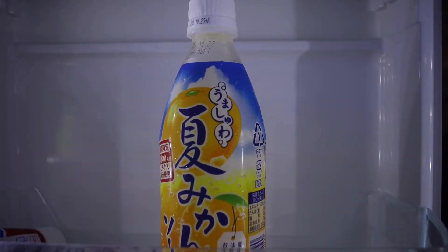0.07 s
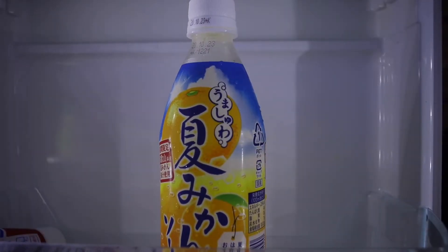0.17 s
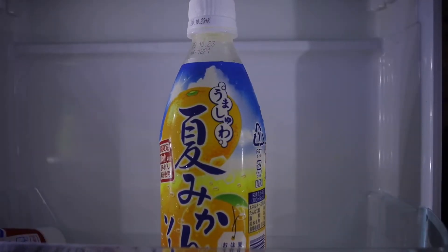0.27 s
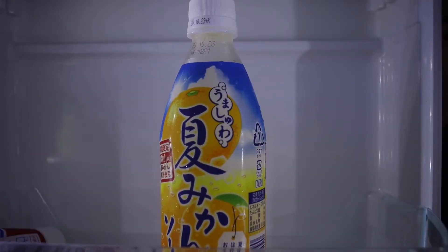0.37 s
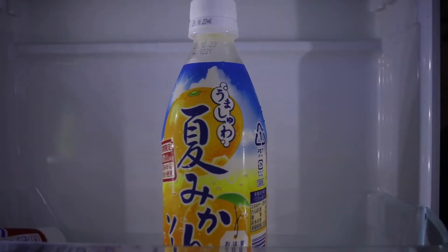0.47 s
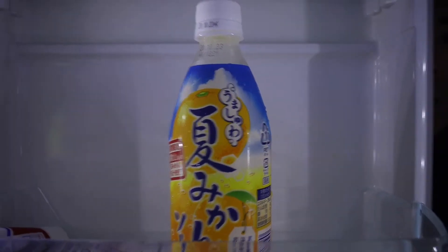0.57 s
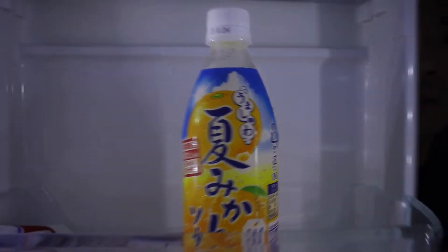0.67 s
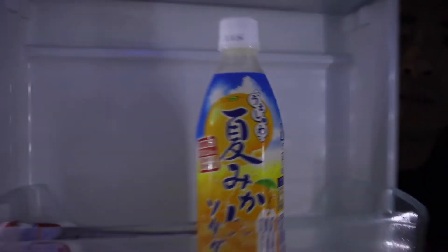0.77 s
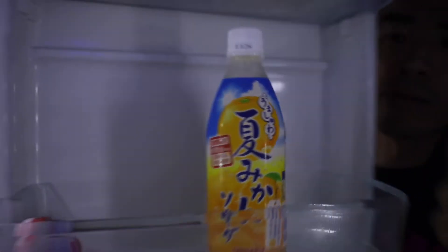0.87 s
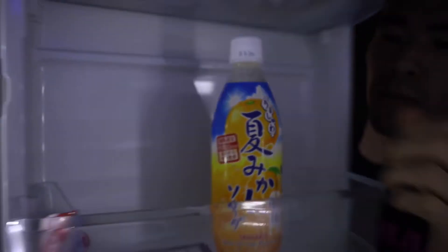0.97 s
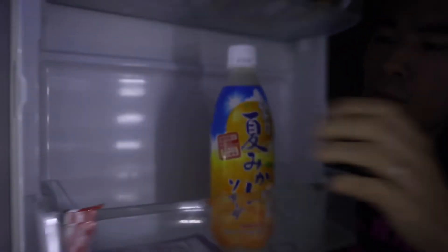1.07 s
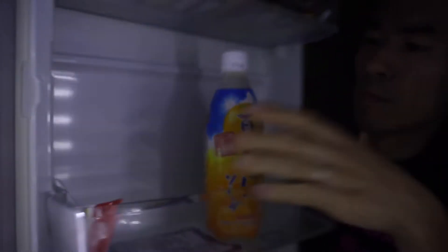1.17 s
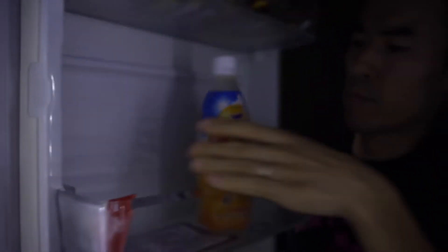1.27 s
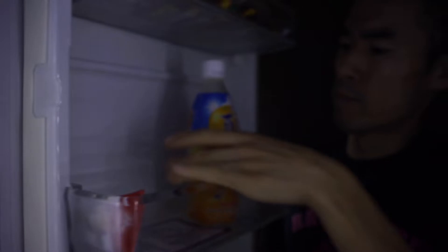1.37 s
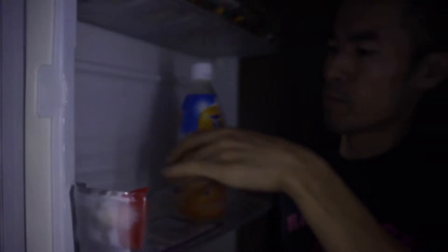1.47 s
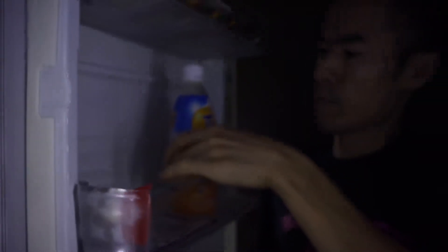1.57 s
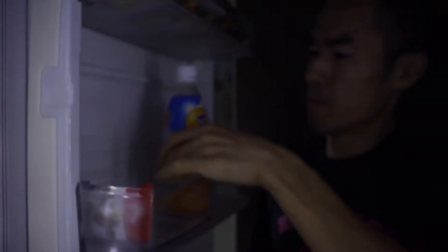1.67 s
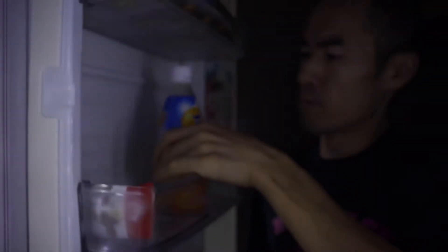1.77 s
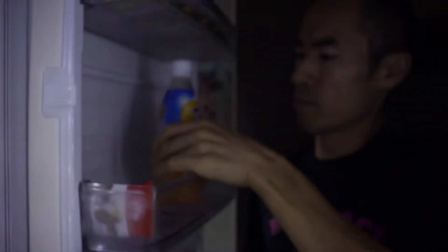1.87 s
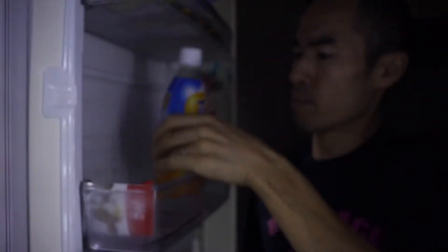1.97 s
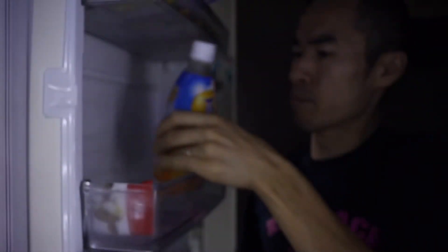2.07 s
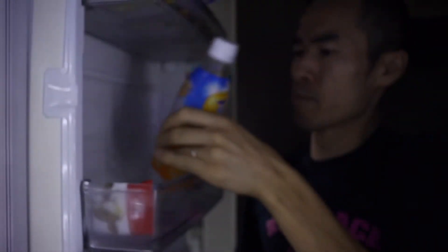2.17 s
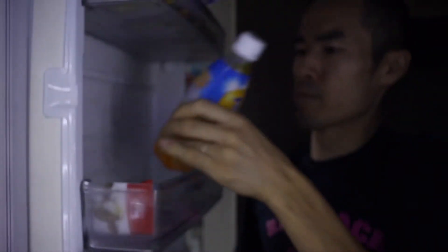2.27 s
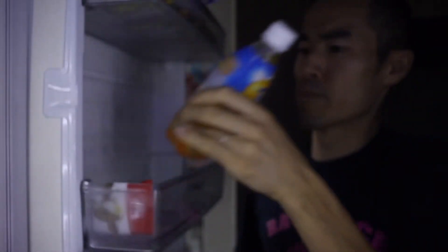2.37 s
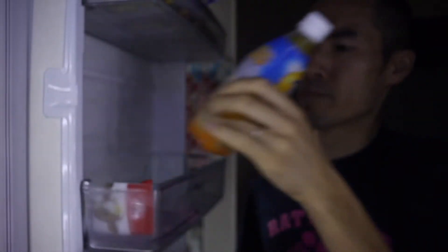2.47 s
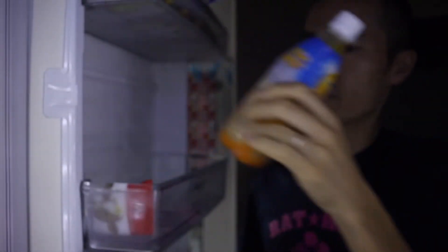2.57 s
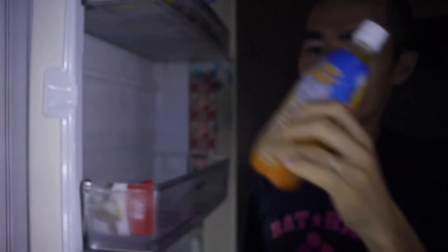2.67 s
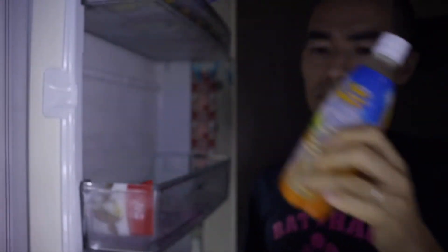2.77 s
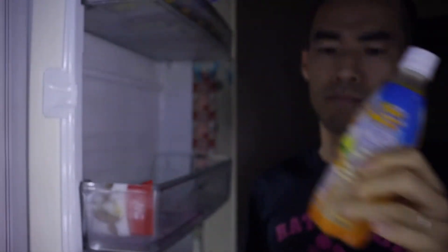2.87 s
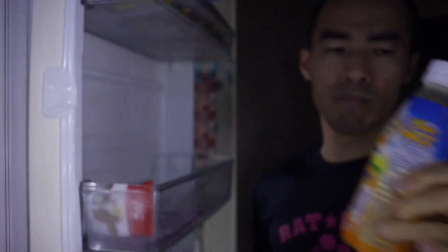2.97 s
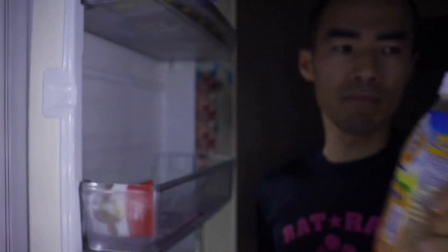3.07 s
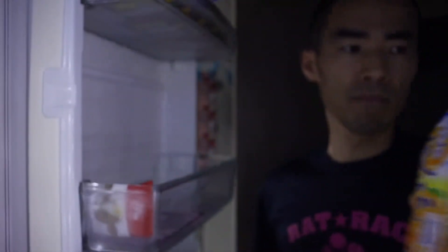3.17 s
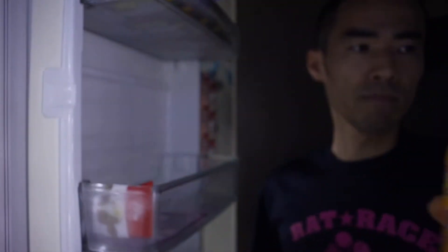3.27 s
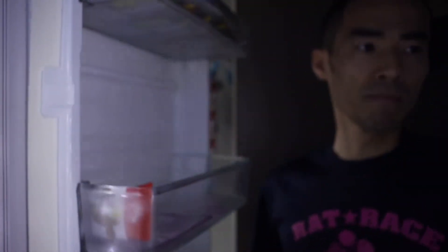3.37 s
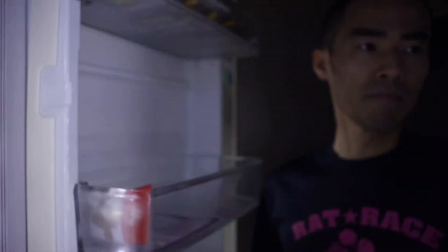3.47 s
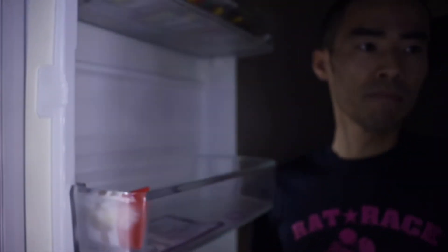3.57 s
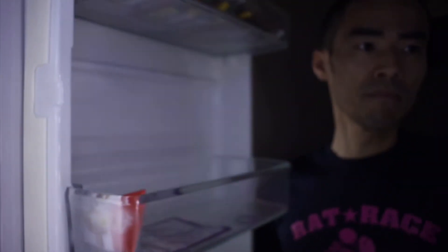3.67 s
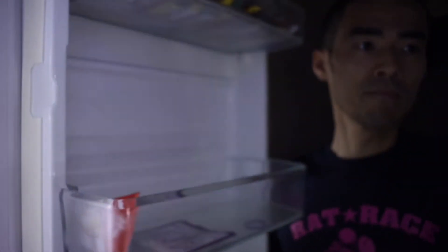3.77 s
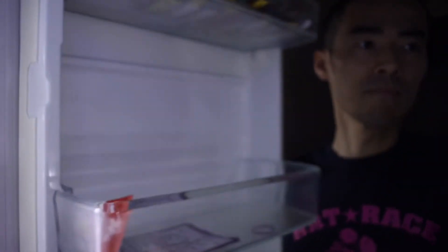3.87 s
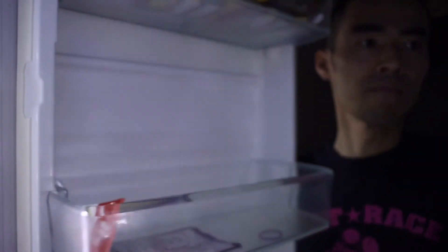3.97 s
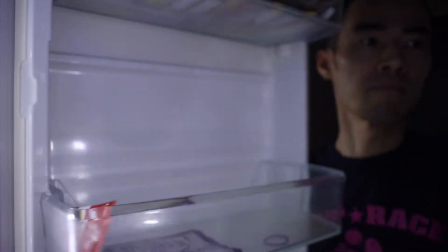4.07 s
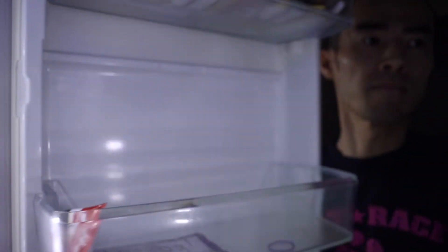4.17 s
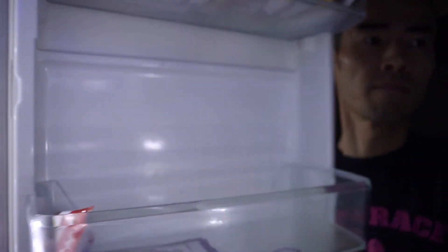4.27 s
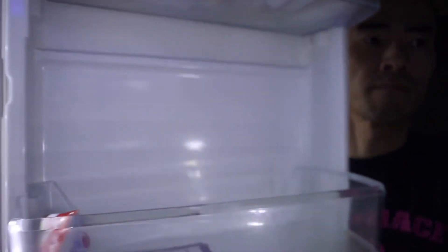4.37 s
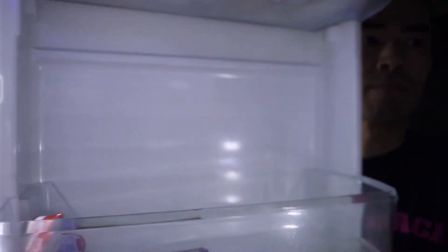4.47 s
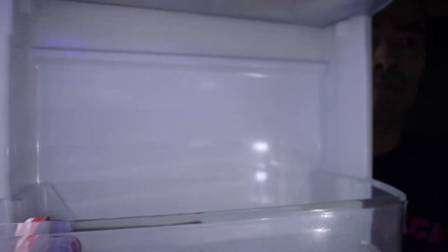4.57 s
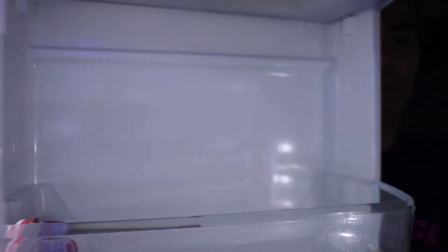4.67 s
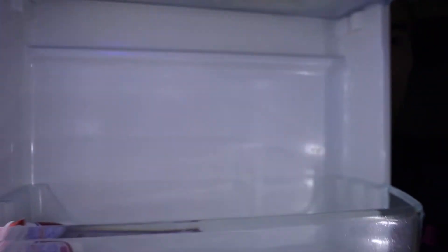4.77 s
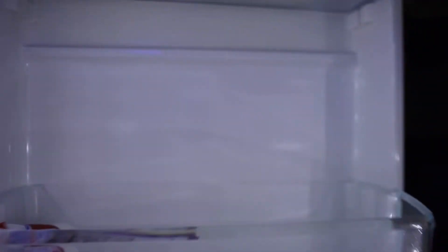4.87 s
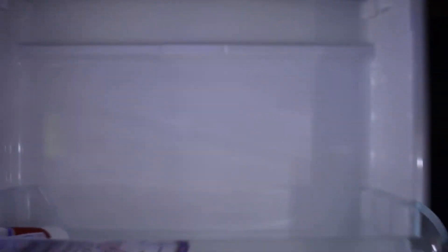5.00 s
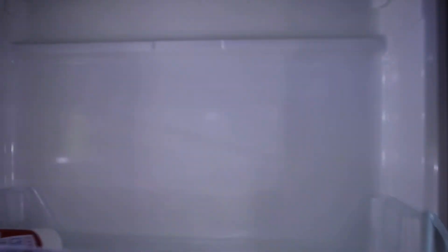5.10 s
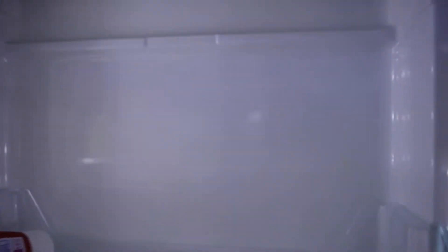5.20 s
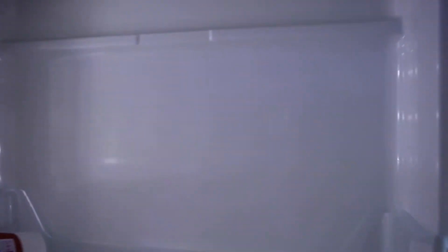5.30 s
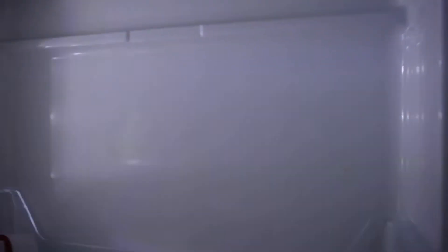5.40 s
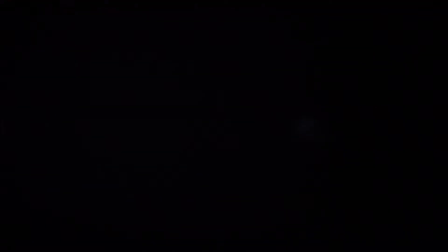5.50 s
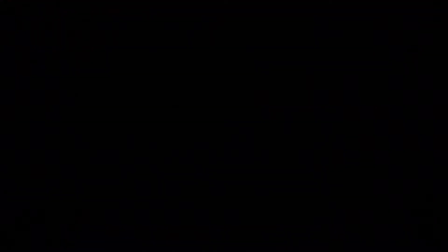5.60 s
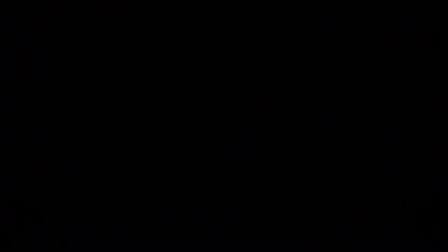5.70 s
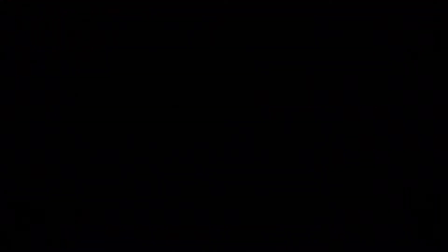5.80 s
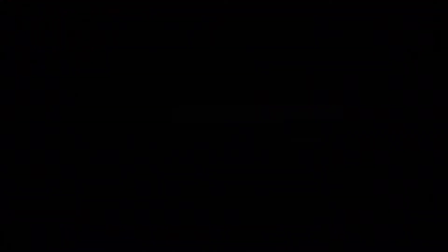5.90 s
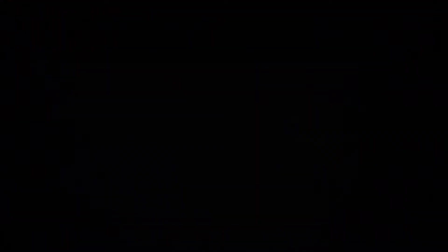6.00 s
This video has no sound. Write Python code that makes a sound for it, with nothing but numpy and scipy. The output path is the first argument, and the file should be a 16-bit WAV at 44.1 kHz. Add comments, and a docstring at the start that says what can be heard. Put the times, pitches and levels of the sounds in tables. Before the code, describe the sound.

A fridge door's seal peels open with sharp snaps, a full plastic bottle clacks in its rack, then the door slams with a boom.

```python
"""A refrigerator heard from inside its door, over low hum, rumble and soft hiss. The magnetic seal peels open with
sharp snaps, the door swings with dull knocks, a sleeve rustles and a full plastic bottle clacks and rocks in its rack.
The machine runs down and the bottle is lifted out. The door swings back, its hinge clicks, the seal is squeezed, the
catch snaps over and a heavy thump booms in the cabinet and leaves the shelves shuddering.
Blows ring decaying modes and dense noise clatter; rubs are uneven coloured noise; booms are swelling low sines."""
import sys
import numpy as np
from scipy import signal
from scipy.fft import rfft, irfft, next_fast_len
from scipy.io import wavfile
from scipy.ndimage import uniform_filter1d

SR = 44100
rng = np.random.default_rng(int(sys.argv[2]) if len(sys.argv) > 2 else 0)


def pcm_store(signal):
    """Save signal as 16-bit PCM."""
    levels = np.round(np.clip(np.atleast_2d(signal), -1, 1) * 32767)
    wavfile.write(sys.argv[1], SR, levels.astype(np.int16).T)


N = 266408
TIME = np.arange(N) / SR
RING = TIME[:SR]  # one second, the life of a blow

# The background's rumble and hiss. Each row: frequency in Hz, relative density in dB per Hz.
RUMBLE_COLOUR = [(15, -30), (28, -12), (43, 3), (64, -5), (88, 1), (115, 1), (150, -6), (188, 0),
                 (230, -10), (400, -22), (900, -60)]
HISS_COLOUR = [(120, -20), (260, -2), (520, -4), (1000, -10), (1700, -11), (2600, -15), (4600, -15),
               (8000, -21), (16000, -25)]
# The compressor's hum. Each row: frequency in Hz, level in dB before the on and off gains.
HUM_LINES = [(59.2, -49.5), (118.4, -57), (544, -68.5), (1370, -67)]
# Air moved by the door. Each row: peak in seconds, level in dB, attack and release in seconds per 60 dB.
DRAUGHTS = [(.1, -49.5, 1.5, 5.9), (4.2, -51, 2.7, 5.8), (5.35, -50, 1.7, 6)]
RUMBLE_DB, HISS_DB, SHUT_HISS_DB = -59, -58.5, -9.5  # the last is the change as the door shuts
MACHINE_OFF_S, RUN_DOWN_S = 1.63, 0.41
HUM_ON_DB, HUM_OFF_DB, RUSH_DB = -1, -16.5, -54.5  # a trace of hum stays
SEALING_S = 0.6  # time for the seal to close the last gap

# Rubs, in order: seal peeling in two pulls, sleeve reaching in, hand and load scuffing the rack,
# seal squeezed, catch sliding over its ramp, shelves shuddering.
# Each row: peak in seconds, nominal level in dB, attack and release in seconds per 60 dB.
PEEL_STROKES = [(.155, -32.5, 0.092, 0.24), (.22, -30.5, 0.34, 0.13)]
SLEEVE_STROKES = [(1.11, -47.5, 1, 0.94), (1.31, -48, .4, 1.6), (1.75, -56.5, .9, 2)]
SCUFF_STROKES = [(1.25, -27, 0.076, 1), (2.04, -56.5, 0.53, 0.65), (2.53, -57, .15, 0.57),
                 (3.125, -44.5, 0.056, 1), (4.06, -39, 0.41, 0.55)]
SEAL_STROKES = [(5.14, -29, 0.079, 0.6), (5.355, -21.5, 0.43, 0.37)]
SLIDE_STROKES = [(5.365, -34, 0.55, 0.054)]
SHUDDER_STROKES = [(5.5, -28.5, 0.55, 1.5), (6.0, -38, 1.6, 1.4)]
# Their colours; shelves share the seal's. Each row: frequency in Hz, relative density in dB per Hz.
PEEL_COLOUR = [(60, -10), (120, -8), (330, -3.5), (550, -11), (900, -18.5), (1900, -23.5), (3800, -20),
               (7000, -34.5), (16000, -41)]
SLEEVE_COLOUR = [(300, -16), (600, -6), (1350, -3), (2500, -9), (6000, -9), (11000, -14), (16000, -20)]
SCUFF_COLOUR = [(70, -15.5), (130, -6.5), (260, -2.5), (480, -11.5), (780, -18), (1050, -25.5), (1550, -19),
                (2600, -31), (6000, -40.5), (15000, -45.5)]
SEAL_COLOUR = [(50, -10), (90, 4.5), (200, -11.5), (400, -18), (900, -32.5), (1700, -32), (3000, -42),
               (7000, -44), (16000, -50)]
SLIDE_COLOUR = [(300, -27), (900, -3), (1500, -3), (2200, -6), (3000, -15), (7000, -25), (16000, -32)]
# Lined-door resonances in the clatter and most rubs. Each row: centre in Hz, width in Hz, lift in dB.
CAVITY = [(175.7, 44.7, 6), (259.5, 13, 9.5), (310.3, 40, 2.5), (531.6, 17.2, 7.5), (693, 50, 7.5),
          (895, 72, 12), (1239, 36, 3.5), (1352, 31, 10), (1730, 32, 3), (1874, 38, 8), (2120, 57, 4),
          (2740, 79, 5), (3180, 130, 5), (3886, 140, 3), (4760, 53, 4.5), (6190, 100, 5)]

# Low notes of the flexing door panel. Each row: start in seconds, frequency in Hz, level in dB.
THUDS = [(.147, 117, -21), (.223, 117.2, -17), (2.009, 184, -38.5), (3.892, 123, -39), (3.951, 122, -25.5),
         (4.049, 125.5, -25), (4.439, 176, -30.5), (5.047, 139, -24)]
# The landing door and the shut cabinet ringing on. Each row: frequency in Hz, level in dB, t60 in seconds.
BOOM_MODES = [(70.4, 9.5, 0.086), (74.5, -10, 0.73), (158.5, -14.5, 0.18), (209.6, -26.5, 1)]
THUD_RISE_S, THUD_T60_S = 0.007, 0.17
BOOM_S, BOOM_RISE_S = 5.3755, 0.026
# The catch jolts the panel after a short lag: Hz, dB, t60 in seconds.
JOLT_LAG_S, JOLT_MODE = 0.0088, (200, -4, 0.027)

# Sharp snaps of seal, hinge and shelves, then dull knocks of the swinging door and its load.
# Each row: start in seconds, relative level in dB, bass in dB, hardness in dB per octave.
SNAPS = [(.011, -34.5, -14, -3), (.042, -32.5, -5.5, 0.5), (.089, -27, 1.5, 1.4), (.124, -26, 0, 2.5),
         (.141, -22, -1, -1.5), (.204, -21, -5, 2.5), (.217, -11, -8, -1), (.756, -33, -9.5, -1.5),
         (4.033, -34, 0, 1), (4.049, -31, 1.5, -.5), (4.102, -41, -11, 2.5), (5.091, -23, -3, -2),
         (5.106, -31, -3, 2.5), (5.134, -22, 1, 0), (5.163, -17.5, -10, -1), (5.544, -32.5, 5, 0),
         (5.609, -35, 3, 0.5), (5.973, -25.5, -18, -3.5)]
KNOCKS = [(.535, -18, -6, -3.5), (.570, -23.5, -2, 2.5), (.665, -21.5, -0.5, -3.5), (.82, -38.5, -1.5, -4),
          (.901, -41.5, 9, -3), (.965, -28.5, 3.5, 1), (1.249, -18.5, -15, -2), (1.343, -19.5, -19, 4.5),
          (1.709, -31, 7, 1.5), (3.097, -39.5, 11.5, 3.5), (3.119, -36, 3, 5.5), (3.147, -46, 8.5, 6.5),
          (3.389, -33, -0.5, -0.5), (3.435, -40, 4.5, 0.5), (3.514, -26.5, -0.5, -0.5),
          (3.581, -31, 8, 1.5), (4.161, -29.5, -1, -3.5), (4.285, -34, -4, -5)]
# Bottle against rack, its base on the way out, hinge over its detent, catch over, door landing.
# Each row: start in seconds, relative level in dB.
CLACK = [(1.3108, -12.5)]
BUMP = [(1.892, -31.5)]
DETENT = [(3.884, -23.5)]
CATCH = [(5.239, -10)]
SLAM = [(5.3662, -14.5)]
# Ringing parts. Each row: nominal frequency in Hz, relative level in dB, t60 in seconds.
LINER_MODES = [(113.3, 1.5, 0.28), (185, -3.5, 0.21), (362, -0.5, 0.056), (537.4, -2.5, 0.16),
               (833, 6, 0.059), (1126, -2.5, 0.08), (1340, -20, 0.15), (1962, 2, 0.051), (2670, -16, 0.058),
               (3050, -4.5, 0.051), (3320, -23, 0.13), (3980, -8.5, 0.064), (4500, -12, 0.085),
               (5630, -16, 0.085)]
DOOR_MODES = [(96.2, -2.5, 0.17), (131, -11, .13), (181.1, -2.5, 0.18), (239, 0.5, 0.086), (302.7, 1, 0.1),
              (550, -14, 0.053), (751, 4, 0.049), (890, 2, 0.076), (1076, -42, 0.017), (1364, -11, 0.19),
              (1540, -3, 0.053), (2110, -9, .06), (2700, -21, .05)]
RACK_MODES = [(240, -14.5, .15), (393, -23.5, 0.12), (808.5, -1.5, 0.12), (855, 2.5, 0.12),
              (1104, -9, 0.22), (1430, -3.5, .13), (1656, 2.5, 0.054), (1713, -6.5, 0.12),
              (2110, -10.5, 0.16), (2453, -9, 0.091), (2844, -1, 0.052), (3058, 2, 0.037),
              (3517, -5.5, 0.053), (4800, -28, 0.037), (5740, -11.5, .06), (6900, -11, .06)]
BOTTLE_MODES = [(138, -1, 0.15), (495, -3.5, 0.075)]
CATCH_MODES = [(176, -8, 0.076), (633, -7, 0.076), (923, 17, 0.063), (1165, 24, 0.025), (1385, -1.5, 0.15),
               (1820, 3.5, 0.066)]
SLAM_MODES = [(266, -0.5, 0.084), (337, -1.5, 0.084), (546, -3.5, 0.17), (902, -6, 0.097), (1342, 4, 0.072),
              (1730, 2, 0.023), (1810, -4, 0.048), (2097, 6.5, 0.031), (3197, 0.5, 0.029),
              (3700, -24, 0.094), (6100, -23, 0.091)]
# Many close, short modes of thin plastic. Each row: frequency in Hz, relative density in dB per Hz.
CLATTER_COLOUR = [(100, -2), (450, -5), (900, -6), (1700, -8), (3200, -13), (4600, -18), (7000, -18),
                  (15000, -23)]
# Bass, middle, treble and air. Each row: low edge in Hz, high edge in Hz.
REGISTERS = [(60, 400), (400, 1500), (1500, 5000), (5000, 17000)]
# The rocking bottle: its first knock, then the spacing and the change per knock.
ROCK_S, ROCK_DB, ROCK_BASS_DB, ROCK_HARDNESS = 1.381, -17, -10, 2.5  # hardness in dB per octave
ROCK_PERIOD_S, ROCK_FALL_DB, ROCK_BASS_GAIN_DB, ROCK_SOFTENING = 0.033, 10, 6, 3.6

TOP_HZ = 16200  # upper limit of the recorder


def undb(db):
    """Turns decibels into gain."""
    return 10 ** (np.asarray(db) / 20)


def fade(t60):
    """Decays exponentially by 60 dB in t60 seconds, with a floor of 3 ms on t60."""
    return np.exp(-np.log(1000) * RING / max(t60, .003))


def add(out, s, sound):
    """Mixes a sound in at time s."""
    i = int(s * SR)
    out[:, i:i + sound.shape[1]] += sound[:, :N - i]


def band(x, lo, hi):
    """Passes a band with a causal filter."""
    sos = signal.butter(4, (lo, hi), "band", fs=SR, output="sos")
    return signal.sosfilt(sos, x + 1e-18)


def noise(size, colour, resonances=(), wide_hz=800, close_hz=370):
    """Coloured stereo noise of rms 1, lifted at resonances; long waves reach both sides alike."""
    f = np.maximum(np.fft.rfftfreq(size, 1 / SR), 1)
    hz, db = np.transpose(colour)
    lift = 1 + sum(undb(lift_db) ** 2 / (1 + (2 * (f - centre) / width) ** 2)
                   for centre, width, lift_db in resonances)
    shape = undb(np.interp(np.log(f), np.log(hz), db)) * np.sqrt(lift)
    mid, side = rfft(rng.standard_normal((2, size))) * shape
    side = side / np.sqrt(1 + (wide_hz / f) ** 2 + (close_hz / f) ** 6)
    x = irfft(np.array([mid + side, mid - side]), size)
    return x / x.std()


def strokes(rows):
    """Gain of strokes that swell by 60 dB in their attack and die by 60 dB in their release."""
    power = 0
    for s, db, attack, release in rows:
        drop = 60 * np.maximum((s - TIME) / attack, (TIME - s) / release)
        power = power + undb(db - drop) ** 2
    return np.sqrt(power)


def background(waver=0.12):
    """Hum lines of drifting phase and a rush of air that run down, rumble with draughts, and hiss."""
    running = np.clip(1 - (TIME - MACHINE_OFF_S) / RUN_DOWN_S, 0, 1)
    drift = np.interp(TIME, np.arange(70) / 10, rng.standard_normal(70))
    hum = 0
    for hz, db in HUM_LINES:
        phase = 2 * np.pi * hz * TIME + waver * drift * hz / HUM_LINES[0][0]
        hum = hum + undb(db) * np.sqrt(2) * np.sin(phase)
    hum = hum * undb(HUM_OFF_DB + (HUM_ON_DB - HUM_OFF_DB) * running)
    rumble_gain = np.hypot(undb(RUMBLE_DB), strokes(DRAUGHTS))
    rumble = noise(next_fast_len(N), RUMBLE_COLOUR)[:, :N] * rumble_gain
    # the shut door muffles the kitchen's hiss
    kitchen = undb(HISS_DB + SHUT_HISS_DB * np.clip((TIME - BOOM_S) / SEALING_S, 0, 1))
    hiss_gain = np.hypot(kitchen, undb(RUSH_DB) * running)
    hiss = noise(next_fast_len(N), HISS_COLOUR)[:, :N] * hiss_gain
    return hum + rumble + hiss


def rubbing(rows, colour, grain_db, resonances=(), patchy_db=2.5, size=300):
    """Friction: strokes of noise in small uneven slips, and in longer patches as pressure changes."""
    slips, patches = (uniform_filter1d(rng.standard_normal(N), span) * np.sqrt(span)
                      for span in (size, 10 * size))
    unevenness = undb(grain_db * slips + patchy_db * patches)
    return noise(next_fast_len(N), colour, resonances)[:, :N] * unevenness * strokes(rows)


def friction():
    """Peeling seal, sleeve, squeezed seal, sliding catch and shuddering shelves, all as uneven noise."""
    peel = rubbing(PEEL_STROKES, PEEL_COLOUR, grain_db=1.0, resonances=CAVITY, patchy_db=5.0)
    sleeve = rubbing(SLEEVE_STROKES, SLEEVE_COLOUR, grain_db=.6, patchy_db=1.0)
    seal = rubbing(SEAL_STROKES, SEAL_COLOUR, grain_db=2.5, resonances=CAVITY, patchy_db=1.0)
    slide = rubbing(SLIDE_STROKES, SLIDE_COLOUR, grain_db=3.5, patchy_db=1.9)
    shudder = rubbing(SHUDDER_STROKES, SEAL_COLOUR, grain_db=1.5, resonances=CAVITY, patchy_db=1.0)
    return peel + sleeve + seal + slide + shudder


def swell(modes, rise_s):
    """A soft push, several milliseconds long, lets low modes swell up and ring out."""
    push = np.sin(np.pi / 2 * np.minimum(RING / rise_s, 1))
    ring = sum(undb(db) * fade(t60) * np.sin(2 * np.pi * hz * RING) for hz, db, t60 in modes)
    return (push * ring)[None]


def boom():
    """The flexing panel thuds, the catch jolts it, and the shut cabinet booms in its lowest modes."""
    out = np.zeros((2, N))
    for s, hz, db in THUDS:
        add(out, s, swell([(hz, db, THUD_T60_S)], THUD_RISE_S))
    add(out, CATCH[0][0] + JOLT_LAG_S, swell([JOLT_MODE], THUD_RISE_S))
    add(out, BOOM_S, swell(BOOM_MODES, BOOM_RISE_S))
    return out


def modal(modes, spread, wide_hz=2100, detune=0.013, scatter_db=4.5):
    """Modes rung by one blow; widely spread contact points vary their strengths and pitches more."""
    out = np.zeros((2, len(RING)))
    draws = rng.standard_normal((len(modes), 4))
    for (hz, db, t60), (shift, size, sign, lag) in zip(modes, draws):
        # short waves differ more in phase between the sides
        offset = np.sign(lag + .5) * np.array([[1], [-1]]) * min(hz / wide_hz, 2 * np.pi / 9)
        t = RING[:int(min(t60, 1) * SR)]
        swing = np.sign(sign) * undb(db + spread * scatter_db * size - 60 * t / t60)
        pitch = hz * (1 + spread * detune * shift)
        out[:, :len(t)] += swing * np.sin(2 * np.pi * pitch * t + offset)
    return out


def unit(x, size=880):
    """Scales a blow so that its first 20 ms have rms 1."""
    return x / np.sqrt(np.mean(x[:, :size] ** 2))


def blows(rows, modes, dense_db, dense_t60s, trim_dbs, pan_db, contact_s, crack_db, tail_db, spread,
          crack_t60=0.0048, tail_t60s=(.8, .7, .4, .3), tail_dbs=(2, -2, -3, -6)):
    """Blows ring modes and plastic clatter; cabinet and kitchen answer with a longer, darker tail."""
    out, size = np.zeros((2, N)), len(RING)
    clatter = noise(2 * size, CLATTER_COLOUR, CAVITY)
    clatters = [band(clatter, lo, hi) for lo, hi in REGISTERS]
    # a soft contact takes longer to build up; a hard one starts with a crack
    press = (1 - np.exp(-RING / contact_s)) * (1 + undb(crack_db) * fade(crack_t60))
    tails = [(1 - fade(0.11)) * fade(t60) * undb(db) / c.std()
             for t60, db, c in zip(tail_t60s, tail_dbs, clatters)]
    short = size // 3  # the direct blow is cut after a third of a second
    centres = np.log2(REGISTERS).mean(axis=1)
    octaves_up = centres[1:] - centres[1]
    for s, db, *touch in rows:
        # weight adds bass; hardness tilts everything above the middle
        bass_db, hardness = touch or (0, 0)
        ring = modal(modes, spread)[:, :short] * press[:short]
        near, far = rng.integers(0, size, 2)  # random stretches of clatter vary each blow
        for k, colour_db in enumerate((bass_db, *(hardness * octaves_up))):
            gain = undb(db + colour_db + trim_dbs[k])
            decay = (undb(dense_db) * fade(dense_t60s[k]) * press)[:short]
            rattle = clatters[k][:, near:near + short] * decay
            add(out, s, gain * unit(rattle + band(ring, *REGISTERS[k])))
            tail = clatters[k][:, far:far + size] * (gain * undb(tail_db) * tails[k])
            add(out, s, tail)
    return out * undb(np.array([[pan_db], [-pan_db]]) / 2)


def bottle():
    """The full bottle scuffs and clacks against the rack, then its base bumps as it is lifted out."""
    clack = blows(CLACK, RACK_MODES, dense_db=7, dense_t60s=(.12, 0.1, 0.085, .045),
                  trim_dbs=(-23.5, -5.5, 1.1, -6.5), pan_db=-0.5, contact_s=.0001,
                  crack_db=2.5, tail_db=-22.5, spread=.1)
    bump = blows(BUMP, BOTTLE_MODES, dense_db=-9.0, dense_t60s=(0.124, 0.06, .046, .044),
                 trim_dbs=(1.0, -6, -26.0, -33), pan_db=1.0, contact_s=0.0043,
                 crack_db=-17, tail_db=-22, spread=0.11)
    scuff = rubbing(SCUFF_STROKES, SCUFF_COLOUR, grain_db=-0.5, resonances=CAVITY)
    return clack + bump + scuff


def rocking(count=4):
    """Knock rows of the rocking bottle: evenly spaced, each weaker and duller than the last."""
    return [(ROCK_S + k * ROCK_PERIOD_S, ROCK_DB - k * ROCK_FALL_DB,
             ROCK_BASS_DB + k * ROCK_BASS_GAIN_DB, ROCK_HARDNESS - k * ROCK_SOFTENING)
            for k in range(count)]


def door():
    """Snaps ring the liner, knocks the door; the hinge clicks, the catch goes over and the door lands."""
    snaps = blows(SNAPS, LINER_MODES, dense_db=10.5, dense_t60s=(0.089, 0.1, 0.062, .06),
                  trim_dbs=(-5.5, -12.5, -10.0, -23), pan_db=-1.5, contact_s=0.0017,
                  crack_db=8, tail_db=-23, spread=0.74)
    knocks = blows(KNOCKS + rocking(), DOOR_MODES, dense_db=7.5, dense_t60s=(0.098, .08, .08, 0.057),
                   trim_dbs=(-6.5, -12, -23.5, -42), pan_db=-0.85, contact_s=0.0043,
                   crack_db=-12, tail_db=-19, spread=0.62)
    detent = blows(DETENT, LINER_MODES, dense_db=7.5, dense_t60s=(0.12, 0.078, 0.061, 0.061),
                   trim_dbs=(-10.5, -15, -4.0, -30.5), pan_db=0.0, contact_s=0.0011,
                   crack_db=-4, tail_db=-14, spread=0.12)
    catch = blows(CATCH, CATCH_MODES, dense_db=9, dense_t60s=(0.15, 0.14, 0.041, 0.026),
                  trim_dbs=(-11.0, -7, -12.5, -33.5), pan_db=-0.5, contact_s=0.0011,
                  crack_db=-13, tail_db=-17, spread=.1)
    slam = blows(SLAM, SLAM_MODES, dense_db=7.0, dense_t60s=(0.17, 0.17, 0.069, 0.05),
                 trim_dbs=(0.0, -9.5, 0, -7.5), pan_db=-3.0, contact_s=0.0006,
                 crack_db=10.5, tail_db=-21.5, spread=.1)
    return snaps + knocks + detent + catch + slam


def scene():
    """Layers friction, cabinet boom, bottle and door over the background."""
    return background() + friction() + boom() + bottle() + door()


def record(dry):
    """The recorder clips at full scale and cuts the top."""
    top_cut = signal.ellip(8, .2, 70, TOP_HZ, fs=SR, output="sos")
    return signal.sosfilt(top_cut, np.clip(dry, -1, 1))


dry = scene()
out = record(dry)
pcm_store(out)
```